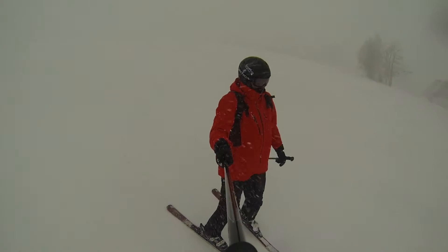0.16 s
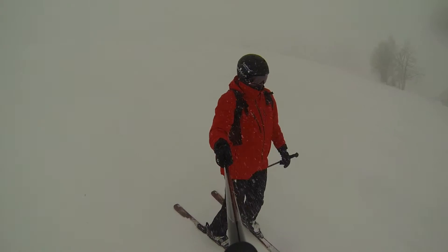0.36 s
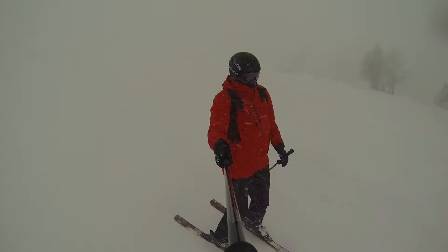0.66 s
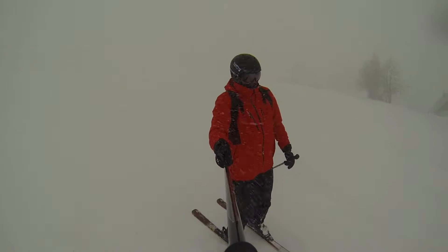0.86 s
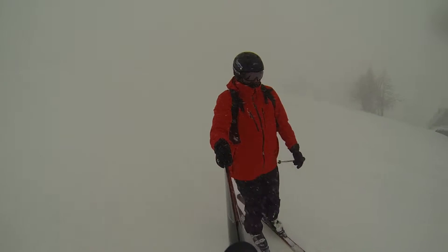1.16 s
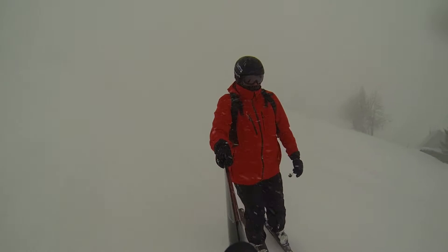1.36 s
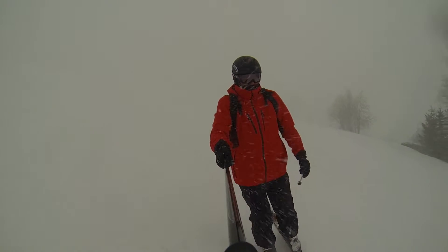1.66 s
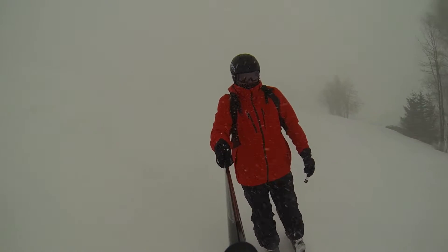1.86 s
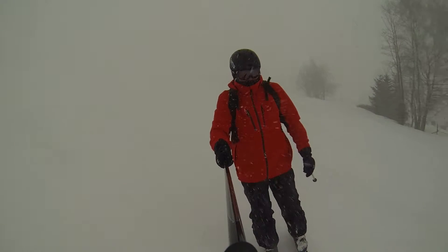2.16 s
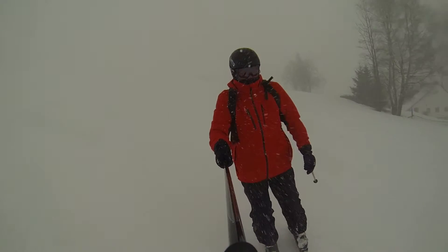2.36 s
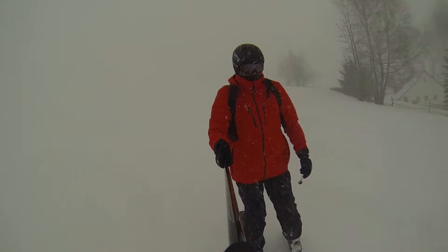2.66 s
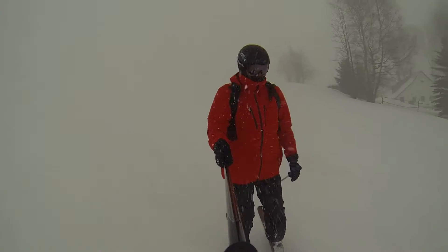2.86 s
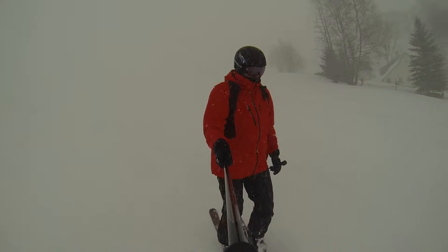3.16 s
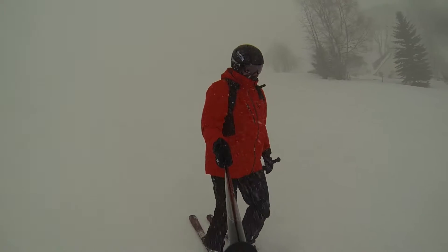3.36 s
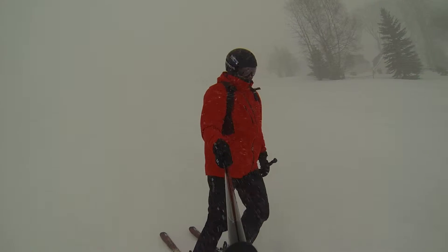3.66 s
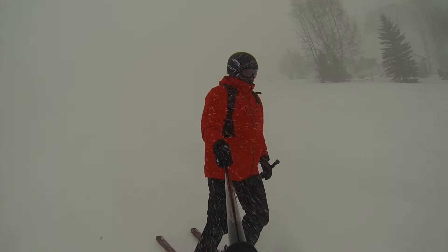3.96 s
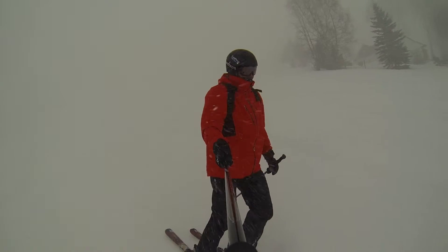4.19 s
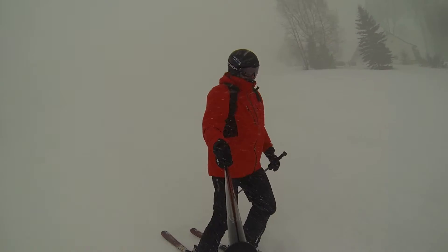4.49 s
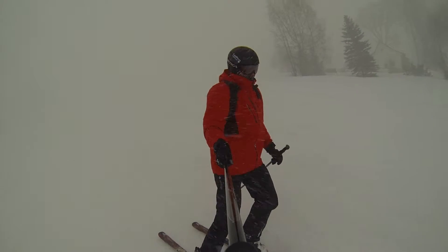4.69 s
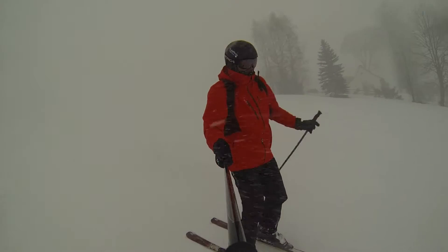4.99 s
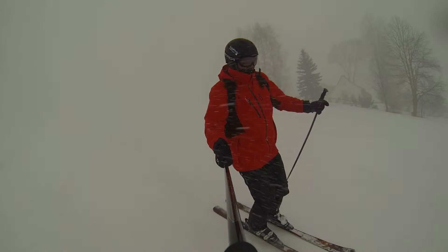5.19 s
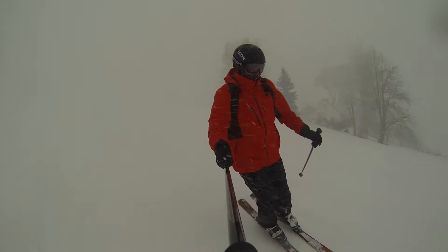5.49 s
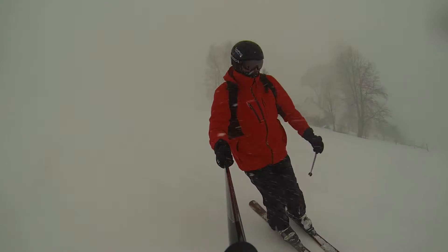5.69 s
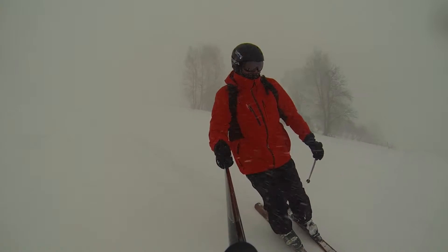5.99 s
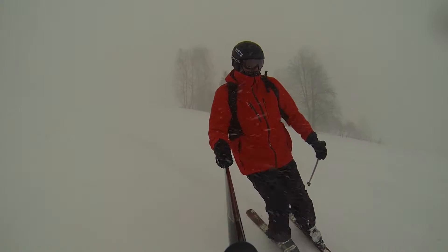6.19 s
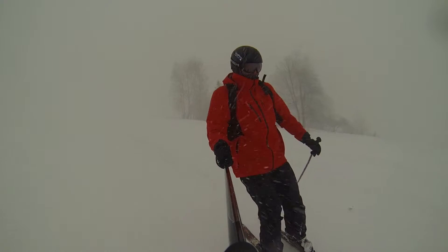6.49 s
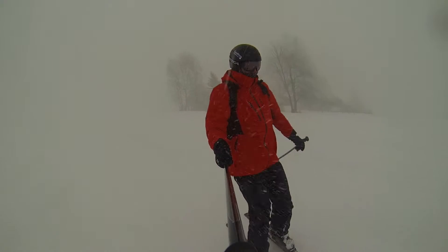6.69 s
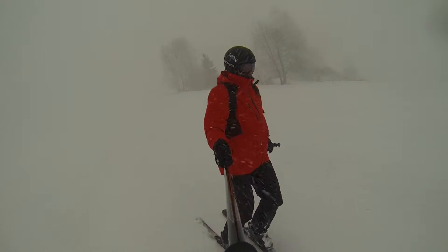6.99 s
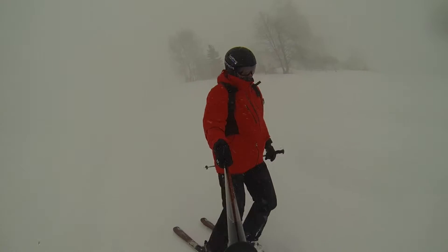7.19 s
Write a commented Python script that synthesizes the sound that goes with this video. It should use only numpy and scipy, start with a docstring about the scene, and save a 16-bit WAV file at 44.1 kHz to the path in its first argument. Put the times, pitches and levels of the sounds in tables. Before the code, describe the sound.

Heard from inside a plastic case on a pole held by a skier in a snowfall. Flakes pelt the shell in a dense, irregular crackle of ticks, pops and occasional dull thuds, swelling and fading. Under it, low wind rumbles and thumps in gusts, strongest past five seconds, while skis hiss faintly and fine snow adds a flickering high hiss.

```python
"""Skiing through falling snow

We listen from inside a plastic camera case held out on a pole. Snowflakes pelt the case:
each one gives it a short push and crumbles, and the case rings for a few milliseconds.
The flurry swells and fades, and the finest snow merges into a flickering hiss. The airstream
rumbles, higher as it speeds up, and the skis hiss faintly underneath; both are coloured noise."""
import sys
import numpy as np
from scipy.fft import rfft, irfft, next_fast_len
from scipy.io import wavfile
from scipy.ndimage import map_coordinates

SR = 44100
rng = np.random.default_rng(int(sys.argv[2]) if len(sys.argv) > 2 else 0)


def wav_out(sig):
    """Save sig, one row per channel (or a flat mono array), as 16-bit PCM at SR to the path in sys.argv[1]."""
    wavfile.write(sys.argv[1], SR, np.round(np.clip(np.atleast_2d(sig).T, -1, 1) * 32767).astype(np.int16))


N = 323694


def amp(db):
    """Turn decibels into gain."""
    return 10 ** (np.asarray(db) / 20)


def unit(x):
    """Scale a sound to an rms of 1."""
    return x / np.sqrt(np.mean(x ** 2) + 1e-20)


def curves(rows, t):
    """Read each column after the time at the times t, with straight lines between rows."""
    s, *columns = np.transpose(rows)
    return [np.interp(t, s, column) for column in columns]


def wobble(rate):
    """Draw a smooth random curve through `rate` random points a second."""
    points = rng.standard_normal(int(N * rate / SR) + 4)
    return map_coordinates(points, [np.arange(N) * rate / SR])


def noise(spectrum):
    """Colour random noise by weighting its frequencies, then scale it to an rms of 1."""
    m = next_fast_len(N + 8192)
    hz, db = np.transpose(spectrum)
    log_hz = np.log(np.fft.rfftfreq(m, 1 / SR) + 1)  # the 1 avoids log(0)
    gain = amp(np.interp(log_hz, np.log(hz), db))
    white = rfft(rng.standard_normal(m))
    return unit(irfft(white * gain, m)[:N])


# Airstream speed, told as the rate at which it sheds eddies.
# Each row: time in seconds, rate in Hz.
AIRSPEED = [(0, 41.8), (0.8, 38.9), (1.1, 46.7), (1.4, 40.87), (2.8, 37.85), (3.8, 40.9), (4.2, 49.75),
            (5.0, 53.06), (5.35, 58), (5.68, 54), (5.85, 44.17), (6.8, 35), (7.34, 50.85)]
# Gusts that thump the case.
# Each row: time of the peak in seconds, length from peak to fade in seconds, rise in dB.
GUST_THUMPS = [(0.236, 0.081, 8), (0.7, 0.53, 10.5), (1.19, 0.12, 8.5), (1.504, 0.12, 13.5),
               (1.845, 0.11, 14), (3.896, 0.26, 9), (5.412, 0.099, 11.5), (5.684, 0.13, 17),
               (6.093, 0.23, 11), (7.153, 0.064, 11)]
# Colour of the big slow eddies. Each row: frequency in Hz, relative level in dB per Hz.
BUFFET_COLOUR = [(8, -21), (18, -9), (23.5, 1), (33, -9), (44, -10), (58, -28), (110, -68), (400, -87)]
# Colour of the smaller eddies at the usual speed.
# Each row: frequency in Hz, relative level in dB per Hz.
EDDY_COLOUR = [(28, -17), (46, 3), (64, -10.5), (84, -18), (900, -66)]
USUAL_WIND_HZ = 48


def wind(buffet_db=-34, eddies_db=-38.0, buffet_db_per_octave=7, eddies_db_per_octave=24):
    """Big slow eddies thump the case in gusts; smaller ones grow louder and faster with the airspeed."""
    t = np.arange(N) / SR
    speed = curves(AIRSPEED, t)[0] / USUAL_WIND_HZ
    speed_octaves = np.log2(speed)
    gust_db = sum(rise_db * np.exp(-((t - s) / length) ** 2) for s, length, rise_db in GUST_THUMPS)
    buffet_level = amp(buffet_db + buffet_db_per_octave * speed_octaves + gust_db)
    buffet = buffet_level * noise(BUFFET_COLOUR)
    # faster air carries the eddies past sooner, which raises their pitch
    travelled = np.cumsum(speed) % N
    eddies = np.interp(travelled, np.arange(N), noise(EDDY_COLOUR))
    eddies_level = amp(eddies_db + eddies_db_per_octave * speed_octaves)
    return buffet + eddies_level * eddies


# How thickly the snow drives against the case; only the differences from the average matter.
# Each row: time in seconds, level in dB.
SNOW_LEVEL = [(0.0, -49), (0.2, -38), (0.92, -38.5), (1.15, -34.0), (1.48, -41.5), (1.79, -33),
              (2.03, -41.5), (2.43, -30), (2.62, -36.5), (2.89, -31.5), (3.15, -38.5), (4.02, -31.5),
              (4.55, -35.5), (4.85, -34.0), (5.7, -36.5), (6.38, -41.5), (6.87, -34.5), (7.34, -38.5)]


def thickness(t):
    """Tell how far the flurry is above the average of its table rows at the times t, in dB."""
    return curves(SNOW_LEVEL, t)[0] - np.mean(SNOW_LEVEL, axis=0)[1]


# Colour of the muffled ski hiss. Each row: frequency in Hz, relative level in dB per Hz.
SKI_COLOUR = [(60, -16), (270, 1.5), (350, -8.5), (800, -15.5), (1400, 7), (2600, -11.5), (12000, -27)]


def skis(level_db=-44.0, waver_db=3.5):
    """The skis make a muffled, wavering hiss of noise that swells half as many dB as the flurry."""
    swell_db = .5 * thickness(np.arange(N) / SR)
    level = amp(level_db + swell_db + waver_db * wobble(12))
    return level * noise(SKI_COLOUR)


# Colour of the finest snow dust. Each row: frequency in Hz, relative level in dB per Hz.
POWDER_COLOUR = [(900, -3), (2200, 5.5), (3400, -0.5), (4300, -2.5), (7400, -8.5), (13500, -14.5),
                 (16000, -28)]


def powder(level_db=-53, growth=2.2, flicker_db=5):
    """The finest snow dust merges into a hiss that rises steeply where the snow is thick."""
    swell_db = growth * thickness(np.arange(N) / SR)
    level = amp(level_db + swell_db + flicker_db * wobble(60))
    return level * noise(POWDER_COLOUR)


# Notes at which the plastic case rings (its resonances).
# Each row: centre in Hz, width in Hz, level in dB.
CASE_RESONANCES = [(177, 860, -26), (615, 380, -28.5), (1330, 230, 1.2), (1560, 305, 1.07),
                   (2086, 470, -5.5), (3350, 1350, -9), (4800, 570, -16), (5330, 1740, -22),
                   (7230, 3050, -25), (10470, 2840, -32.5), (13200, 1500, -35)]


def case_response(size):
    """A tap rings all the resonances, and the ring starts only once the tap has come (it is causal)."""
    hz = np.fft.rfftfreq(size, 1 / SR)
    power = sum(amp(db) ** 2 / (1 + (2 * (hz - centre) / width) ** 2) ** 2
                for centre, width, db in CASE_RESONANCES)
    # folding the cepstrum finds the phase that puts the energy as early as possible
    cepstrum = irfft(np.log(power + 1e-12) / 2)
    cepstrum[1:size // 2] *= 2
    cepstrum[size // 2 + 1:] = 0
    return np.exp(rfft(cepstrum))


def impacts(times, push_db, crumble_db, contact_s, crumble_s, crisp_hz, thud_db, snap, size=512):
    """Flakes land on the case: a soft push and a spray of breaking crystals; levels are rms over 4 ms."""
    count = len(times)
    t, hz = np.arange(size) / SR, np.fft.rfftfreq(size, 1 / SR)
    softness, spread, weight, place, grain = rng.standard_normal((count, 5)).T[:, :, None]

    # a softer flake presses for longer, which gives a duller push
    press_s = contact_s * np.exp(.25 * softness)
    push = 1 / (1 + 2j * np.pi * hz * press_s) ** 4
    # wet, heavy flakes also shove the whole case: this sets the lows, mostly under 900 Hz
    thud = amp(thud_db + 2 * weight) - 1
    push = push * (1 + thud / (1 + 1j * hz / 900))

    # the crystals collapse in a brief swell, and the core of the flake snaps
    age = t / (crumble_s * np.exp(0.79 * spread))
    spray = rng.standard_normal((count, size)) * age * np.exp(1 - age)
    spray += snap * (t == t[8])
    # finer crystals sound brighter
    corner_hz = crisp_hz * np.exp(.45 * grain)
    crumble = rfft(spray) * (1j * hz / (corner_hz + 1j * hz)) ** 3

    # the bending wave returns from the edge: its delay depends on where the flake lands
    delay_s = 0.000547 * np.exp(0.43 * place)
    body = case_response(size) * (1 + 0.42 * np.exp(-2j * np.pi * hz * delay_s))

    window = .004 * SR
    sound = np.zeros((count, size))
    for force, db in ((push, push_db), (crumble, crumble_db)):
        ring = irfft(force * body)
        rms = np.sqrt(np.sum(ring ** 2, axis=1, keepdims=True) / window)
        sound += ring * amp(db)[:, None] / rms
    # add every flake into one track at its own time
    index = np.round(times * SR).astype(int)[:, None] + np.arange(size)
    return np.bincount(index.ravel(), sound.ravel(), N)[:N]


def small_flakes(push_db=-24.5, crumble_db=-35.0, push_growth=0.95, crumble_growth=0.87,
                 range_db=29, count=1800):
    """A dense patter of flakes of many sizes swells and fades in clouds; some flakes are icier."""
    s = rng.uniform(0, (N - 1) / SR, count)
    thick_db = thickness(s)
    cloud_db = 2.6 * wobble(22)[(s * SR).astype(int)]
    size_db = cloud_db - range_db * rng.uniform(0, 1, count)
    icy_db = 3.32 * rng.standard_normal(count)
    push = push_growth * thick_db + size_db + push_db
    crumble = crumble_growth * thick_db + 0.53 * size_db + icy_db + crumble_db
    return impacts(s, push, crumble, contact_s=.00006, crumble_s=0.00051, crisp_hz=2690,
                   thud_db=-7.5, snap=2.0)


def middling_flakes(push_db=-22.0, crumble_db=-28, growth=0.55, size_spread_db=2, icy_spread_db=4.5,
                    count=56):
    """Flakes tick out above the patter, several a second, harder where the snow is thick."""
    place, size, icy = rng.uniform(0, 1, count), rng.standard_normal(count), rng.standard_normal(count)
    # one flake at a random moment in each equal slice of time
    s = (np.arange(count) + place) / count * (N - 1) / SR
    size_db = growth * thickness(s) + size_spread_db * size
    crumble = size_db + icy_spread_db * icy + crumble_db
    return impacts(s, size_db + push_db, crumble, contact_s=.00007, crumble_s=0.00054, crisp_hz=1810,
                   thud_db=-5, snap=3.3)


# The biggest flakes, before the overall trims in big_flakes.
# Each row: start in seconds, push level in dB, crumble level in dB, thud in dB over the push.
BIG_FLAKES = [(0.168, -17.0, -28, -4), (0.202, -17.5, -28, 3), (0.282, -14.0, -19, 7),
              (0.32, -13.0, -23.5, -16.0), (0.612, -9.5, -19, -11), (0.765, -17.0, -34, -14.0),
              (0.812, -8.5, -23, -5), (0.851, -23, -22, 0), (0.991, -26, -20.5, 17),
              (1.068, -18.5, -24.5, -4), (1.152, -15.5, -21, -11), (1.198, -11.5, -18.5, -8),
              (1.259, -14, -27, -11), (1.274, -10.5, -17, -8), (1.329, -17, -23.5, 2.0),
              (1.337, -9, -25.5, -9), (1.346, -17, -27, -20), (1.515, -13.5, -22, -6),
              (1.543, -16.5, -20.5, -4), (1.551, -23, -25, -5), (1.574, -12, -21.5, -1),
              (1.608, -12, -25, -10), (1.757, -14.5, -27, -4), (1.807, -9, -20.5, 0.5),
              (1.818, -13, -29.0, 3), (1.868, -14.5, -24, -10.0), (1.91, -19, -22, -4.0),
              (1.971, -12.5, -15, 0), (2.149, -12.5, -19.5, 1), (2.168, -14, -25.5, -11.0),
              (2.23, -16, -44, -14), (2.352, -12, -24, 2), (2.375, -9.5, -27.0, -15),
              (2.523, -12, -17.5, 5), (2.577, -12.5, -21.5, -3), (2.626, -17.5, -26, -13),
              (2.648, -17, -23, -2), (2.758, -15.5, -18.5, 0.5), (2.846, -12, -32, -11.0),
              (2.891, -20, -17.5, -4), (2.918, -14.0, -21.5, -15), (3.116, -18, -20, -4),
              (3.126, -17.5, -42, -8.0), (3.137, -17, -24, -11), (3.214, -19.5, -17.5, -1),
              (3.357, -11.0, -29, -7), (3.375, -16.5, -26, -13), (3.682, -12.5, -18.5, 0),
              (3.809, -19, -22.5, 11), (3.816, -12, -21, -1), (3.848, -15.5, -28.5, -12.0),
              (3.931, -11.0, -24, -15), (3.995, -16, -27, -4.0), (4.286, -14, -18.5, -8.0),
              (4.315, -11, -20.5, -7.0), (4.373, -18, -30, -2), (4.487, -22.0, -15.5, 8),
              (4.566, -18.5, -25, -12), (4.596, -17.0, -38, 1), (4.702, -11, -24, -14),
              (4.738, -12.0, -21, -17), (4.874, -13.5, -36, -19), (4.918, -15.5, -30.5, 3),
              (4.939, -12, -39, -16), (4.992, -14, -42, -11), (5.006, -14, -23.0, -17),
              (5.152, -17.0, -23.5, -8.0), (5.229, -18.0, -23, 5), (5.425, -18, -26, 1),
              (5.433, -13.5, -22.5, -16.0), (5.53, -16.0, -42, -16.0), (5.671, -18.5, -41, -4),
              (5.698, -11, -22.5, -15), (5.826, -13.5, -29, -21), (5.845, -10.5, -20, -14.5),
              (5.867, -7.5, -30, -5), (6.297, -16.0, -15, -1), (6.47, -17, -17, -0.0),
              (6.491, -17, -32, -14), (6.554, -11, -19, -9), (6.802, -16, -29.0, -19),
              (6.846, -21, -18, -11), (7.007, -17.5, -25, -1), (7.05, -16, -22, -5),
              (7.132, -17, -33.5, -14.0), (7.265, -15, -20.5, 0), (7.291, -15.0, -18.5, -4.0)]


def big_flakes(push_db=0.0, crumble_db=-1.0, thud_db=-1):
    """Single clumps pop against the case; the wet ones thud by shoving all of it."""
    s, push, crumble, thud = np.transpose(BIG_FLAKES)
    return impacts(s, push + push_db, crumble + crumble_db, contact_s=.00007, crumble_s=0.00046,
                   crisp_hz=1910, thud_db=thud[:, None] + thud_db, snap=3.0)


def scene():
    """Add up everything heard from inside the case."""
    air_and_skis = wind() + skis()
    snow = powder() + small_flakes() + middling_flakes() + big_flakes()
    return (air_and_skis + snow)[None]


TOP_HZ = 16300


def record(dry, ceiling=.95):
    """The camera rounds off the tallest peaks and keeps nothing above its band limit."""
    held = dry / (1 + np.abs(dry / ceiling) ** 6) ** (1 / 6)
    m = next_fast_len(N + 8192)
    hz = np.fft.rfftfreq(m, 1 / SR)
    # a steep slope from 15300 Hz, then silence from TOP_HZ up
    band = (hz < TOP_HZ) / np.sqrt(1 + (hz / 15300) ** 50)
    return irfft(rfft(held, m) * band, m)[:, :N]


dry = scene()
out = record(dry)
wav_out(out)
```